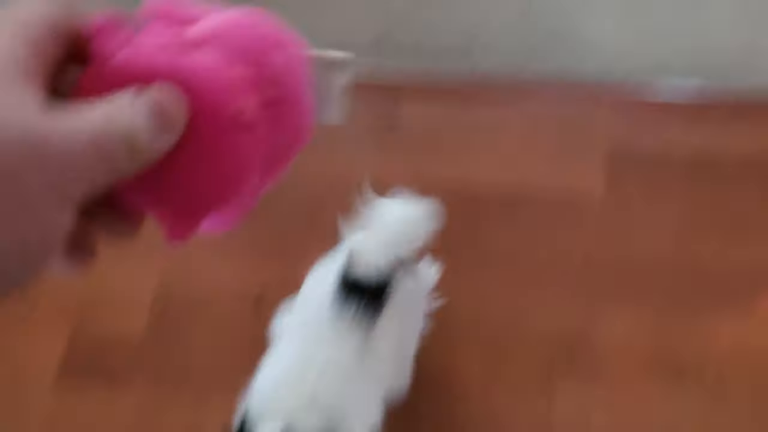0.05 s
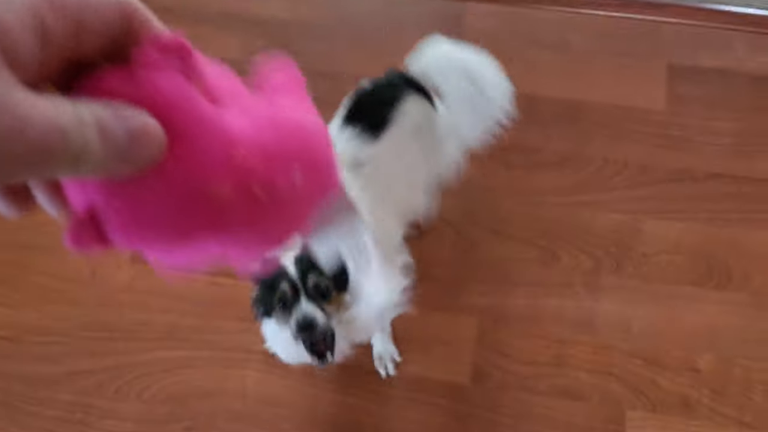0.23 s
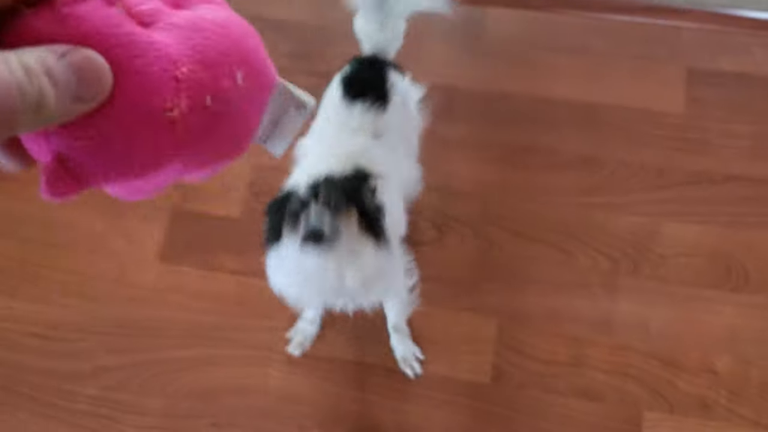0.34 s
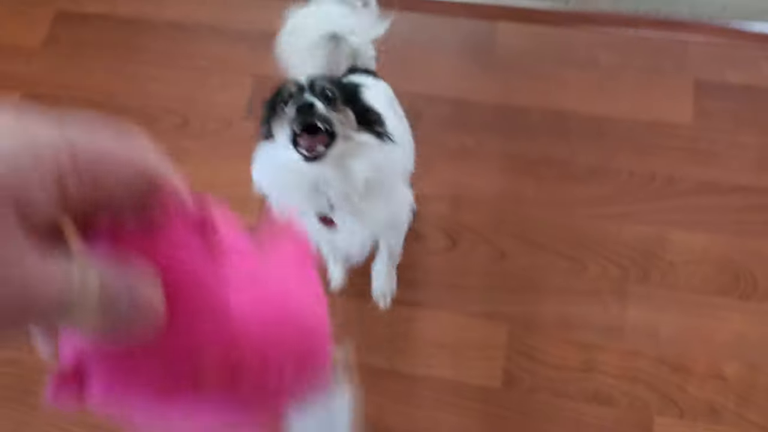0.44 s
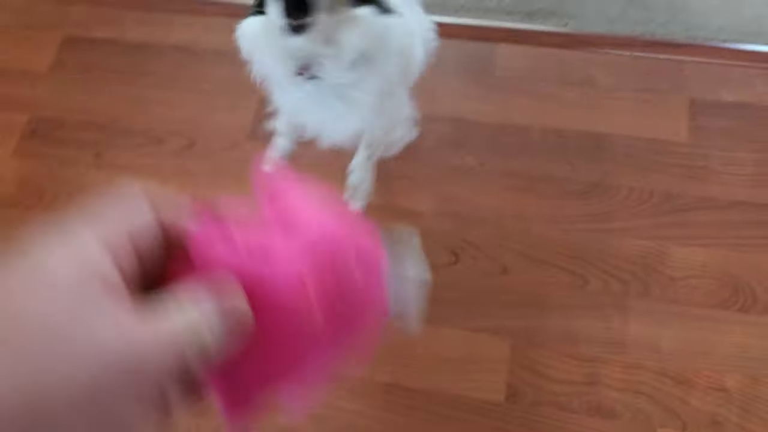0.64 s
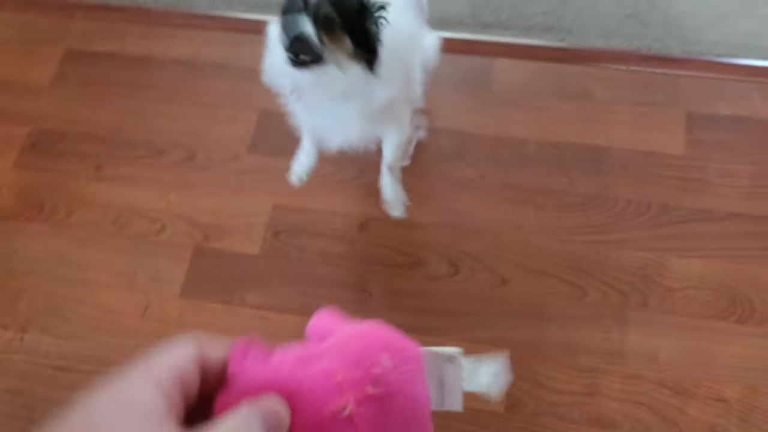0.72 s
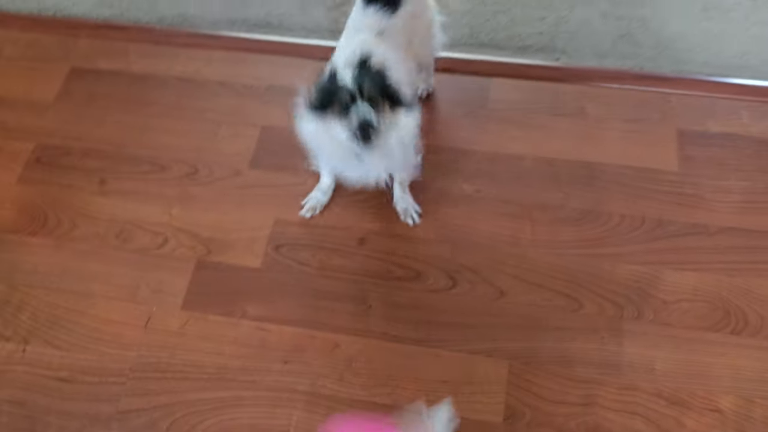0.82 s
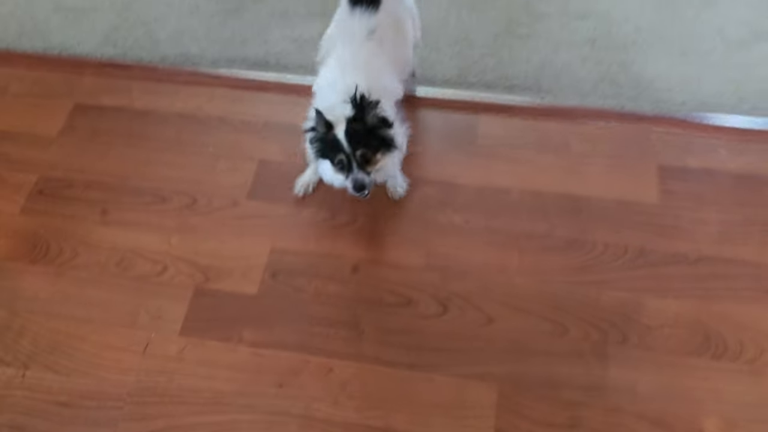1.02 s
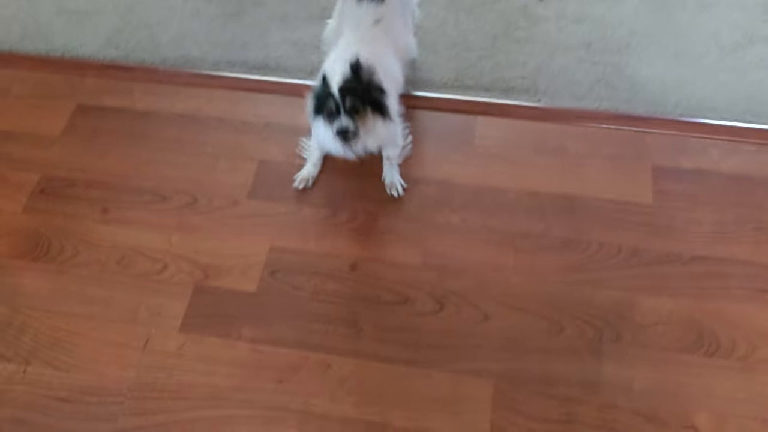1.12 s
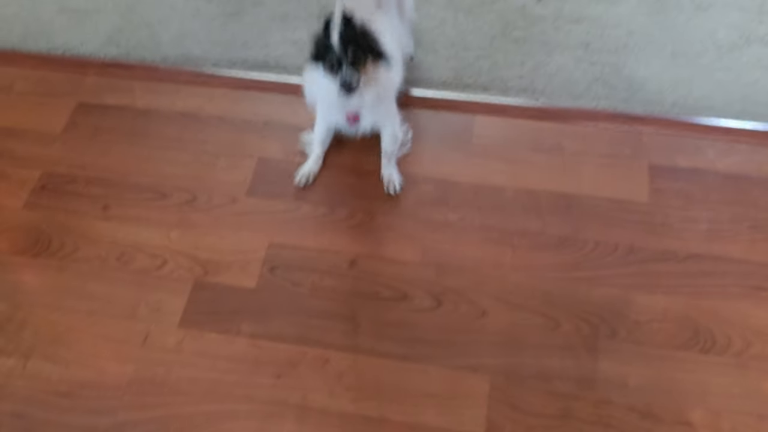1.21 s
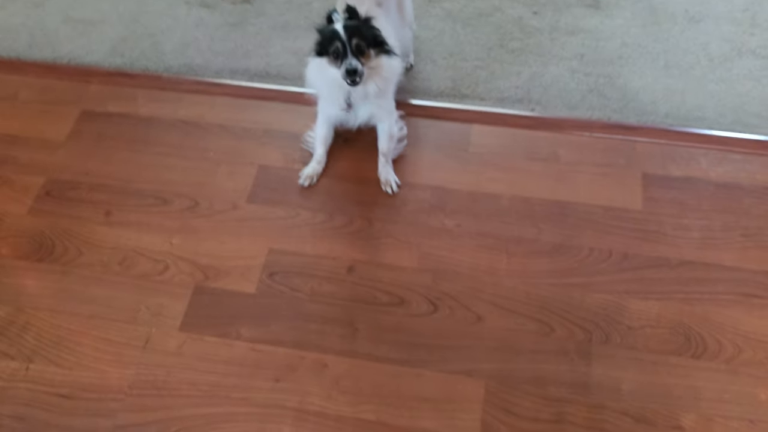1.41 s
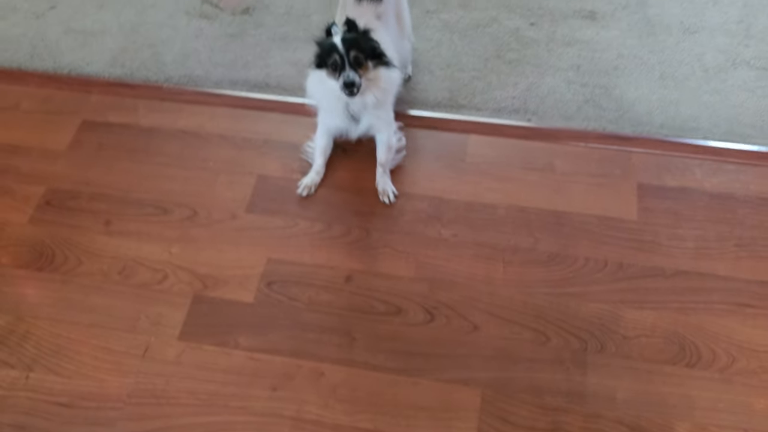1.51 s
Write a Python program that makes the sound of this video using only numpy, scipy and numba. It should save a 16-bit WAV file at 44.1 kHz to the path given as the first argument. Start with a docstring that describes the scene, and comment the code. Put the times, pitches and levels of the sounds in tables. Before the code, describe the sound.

A small dog barks three times in a quiet home with a wooden floor. A paw knock and low floor heave come at 0.05 s amid soft rustle. A high, bright yap hits at 0.23 s, a lower, hoarser one at 0.66, and a last at 1.08 that starts growly and jumps up. Rustles, claw ticks and a soft thud at 0.94 fall between; short room tails, faint air and hum remain.

```python
"""A small dog barks three times, close by, in a room with a hard floor.
Each bark is a train of uneven voice pulses and breath, coloured by resonances of mouth, throat and chest.
Two paw landings and a low chest thump under the first bark are dying tones with noise; claws tick.
Fur and a plush toy rustle as shaped noise. Walls and a fading noise tail answer barks, thuds and ticks.
Behind them the floor heaves once, and there are room air and a faint hum."""
import sys
import numpy as np
from scipy import signal
from scipy.fft import rfft, irfft, next_fast_len
from scipy.io import wavfile
from scipy.ndimage import map_coordinates
from numba import njit

SR = 44100
rng = np.random.default_rng(int(sys.argv[2]) if len(sys.argv) > 2 else 0)


def magnitude_from_level(level_db):
    """Linear magnitude for a level in decibels (20 dB per decade)."""
    exponent = np.asarray(level_db, float) / 20
    return 10 ** exponent


def generate_wav(sig):
    """Save sig (samples, or channels by samples) to the path in sys.argv[1] as 16-bit PCM at SR."""
    pcm = np.round(np.clip(np.atleast_2d(sig).T, -1, 1) * 32767).astype(np.int16)
    wavfile.write(sys.argv[1], SR, pcm)


N = 68355  # length in samples

# how alike left and right are in spread-out noise: (f/Hz, likeness from 0 to 1)
LIKENESS = [(60, 1), (240, 0.7), (950, 0.3), (4000, 0.052)]


def unit(x):
    """Scales a sound to an rms of 1."""
    return x / np.sqrt(np.mean(x ** 2) + 1e-20)


def along(points, hz):
    """Reads a curve of (f/Hz, value) points on a logarithmic frequency axis."""
    f, v = np.transpose(points)
    return np.interp(np.log(hz + 1), np.log(f + 1), v)


def wobble(rate):
    """A smooth random curve with rate random points a second."""
    points = rng.standard_normal(int(N * rate / SR) + 4)
    return map_coordinates(points, [np.arange(N) * rate / SR])


def filtered(x, response):
    """Multiplies the spectrum of x by a response, a function of frequency."""
    n = x.shape[-1]
    m = next_fast_len(n + 8192)
    return irfft(rfft(x, m) * response(np.fft.rfftfreq(m, 1 / SR)), m)[..., :n]


def rush(spectrum, alike):
    """Stereo noise of rms 1: the more side signal is mixed in, the less alike left and right are."""
    def response(hz):
        turn = np.arccos(np.clip(along(alike, hz), -1, 1)) / 2
        return magnitude_from_level(along(spectrum, hz)) * [np.cos(turn), np.sin(turn)]

    mid, side = filtered(rng.standard_normal((2, N)), response)
    return unit(np.array([mid + side, mid - side]))


@njit
def ring(x, a, b):
    """A resonance whose tuning can move: each sample feeds on the two before it."""
    y = np.zeros(len(x) + 2)
    for i in range(len(x)):
        y[i + 2] = x[i] + a[i] * y[i + 1] - b * y[i]
    return y[2:]


def tract(x, hz, width_hz):
    """An air cavity as a resonance passed twice, brought to rms 1."""
    r = np.exp(-np.pi * width_hz / SR)
    a = 2 * r * np.cos(2 * np.pi * hz / SR) * np.ones(len(x))
    sharpened = np.diff(x, n=2, prepend=[0, 0])
    return unit(ring(ring(sharpened, a, r * r), a, r * r))


def voice_source(t, pitch, jitter, alternate, noise):
    """The vocal folds give uneven pulses, and each pulse lets out a puff of noisy breath."""
    draw = rng.standard_normal((200, 2))
    turns = np.cumsum(pitch) / SR
    k = np.arange(int(turns[-1]))
    at = np.interp(k + jitter * np.cumsum(draw[k, 0]), turns, np.arange(len(t)))
    # strong and weak pulses take turns, less and less towards the end
    uneven = 1 + alternate * np.cos(np.pi / 2 * k / len(k)) * (-1) ** k
    size = magnitude_from_level(1.5 * draw[k, 1]) * uneven  # random scatter in dB
    pulses = (size[:, None] * np.sinc(np.arange(len(t)) - at[:, None])).sum(0)
    gate = np.convolve(np.abs(pulses), np.exp(-np.arange(200) / 70))[:len(t)]
    breath = unit(gate * rng.standard_normal(SR // 4)[:len(t)])
    return np.sqrt(1 - noise) * unit(pulses) + np.sqrt(noise) * breath, breath


def bark(rows, jitter, alternate, noise_start, noise_end, upper_start_hz, upper_end_hz,
         throat_hz, throat_db, chest_hz, teeth_hz, onset_db, later_db):
    """Voice pulses and breath sound through mouth, upper, throat, chest and teeth resonances."""
    # breath hiss, shape only: (f/Hz, level/dB per Hz)
    rasp_shape = [(2000, -1.5), (3000, -6.5), (4900, -5.5), (6700, -5.5), (10500, -14), (15800, -17.5)]
    s, *cols = np.transpose(rows)
    t = np.arange(s[0], s[-1], 1 / SR)
    db, pitch, mouth_hz, upper_db, chest_db, hiss_db = (np.interp(t, s, c) for c in cols)
    body = s[[1, -2]]  # glides run from the second point to the last but one
    noise = np.interp(t, body, [noise_start, noise_end])
    upper_hz = np.interp(t, body, [upper_start_hz, upper_end_hz])
    teeth_db = np.interp(t, s[1:3], [onset_db, later_db])
    source, breath = voice_source(t, pitch, jitter, alternate, noise)

    def chest_response(hz):
        return np.exp(-(np.log2((hz + 1) / chest_hz) / 1.05) ** 2)  # half-width in octaves

    def rasp_response(hz):
        return magnitude_from_level(along(rasp_shape, hz) - 60 * (hz < 1500))

    voice = tract(source, mouth_hz, 340)
    voice = voice + magnitude_from_level(upper_db) * tract(source, upper_hz, 230)
    voice = voice + magnitude_from_level(throat_db + upper_db / 2) * tract(source, throat_hz, 330)
    voice = voice + magnitude_from_level(chest_db) * unit(filtered(source + breath, chest_response))
    voice = voice + magnitude_from_level(hiss_db + 7.5) * unit(filtered(breath, rasp_response))
    voice = voice + magnitude_from_level(teeth_db) * tract(breath, teeth_hz, 740)
    fade = np.clip((s[-1] - t) / 0.014, 0, 1)
    return np.pad(magnitude_from_level(db) * fade * voice, (round(s[0] * SR), N))[:N]


def dog():
    """Three barks, each with its own voice and with more room tail as the dog backs away."""
    # one list a bark: (t/s, level/dB, pitch/Hz, mouth resonance f/Hz,
    # upper resonance level/dB, chest level/dB, breath hiss relative level/dB)
    bark_points = [
        [(.22, -48, 559.1, 1206, -11.5, -0.5, -6), (.232, -34.5, 594, 1270, -15, 7, -17),
         (.244, -8.5, 614.7, 1190, -28.5, -8, -39.5), (.268, -11, 659.9, 1451, -18, -14.5, -27),
         (.296, -7.5, 724, 1381, -45, -62, -27.5), (.309, -10.5, 730, 1504, -46, -46, -17.5),
         (.328, -41, 566, 1165, -3.5, -14, -45)],
        [(.648, -67, 366.5, 1346, -12.5, -6, -20), (.662, -31, 374.7, 1280, -15, -7.5, -21),
         (.682, -16.5, 385.6, 1207, 0.5, -47.5, -24.5), (.705, -11.5, 379.5, 1445, -24.5, -16.5, -20),
         (.74, -12, 391.9, 1530, -5, -32.5, -26), (.77, -29.5, 376, 1400, -49, -7, -4.5)],
        [(1.074, -59, 280.1, 952, 7, 19, 0.5), (1.092, -22.5, 281.5, 1060, -6, -6, -24),
         (1.118, -19, 288.1, 1110, 9, -13.5, -20.5), (1.134, -14, 620, 1206, -0.5, -49, -29.5),
         (1.148, -13, 701, 1408, -16.5, -39.5, -26.5), (1.168, -12, 654.6, 1340, -36.5, -32, -35),
         (1.186, -20.5, 618, 1174, -14, -20, -3.5)],
    ]
    # per bark: (pulse timing jitter as share of a period, depth of strong-weak pulses at the start 0-1,
    # noise share 0-1 at the start, at the end)
    voices = [(.025, .7, .35, .01), (.05, .3, .55, .45), (.025, .4, .35, .04)]
    # per bark: (upper resonance f/Hz at the start, at the end, throat f/Hz, throat relative level/dB,
    # chest f/Hz, hiss at the teeth f/Hz, its level/dB at the onset, later)
    throats = [(1924, 1950, 3360, -12, 900, 5750, -30, -23), (1764, 1870, 3400, -28, 570, 6100, -27, -25),
               (1833, 1860, 2438, -12.5, 355, 4900, -5, -50.5)]
    # per bark: (room tail level/dB)
    tail_levels = [-10, -9, -6.5]
    out = 0
    for rows, voice, throat, tail_db in zip(bark_points, voices, throats, tail_levels):
        out = out + placed(bark(rows, *voice, *throat), -6, .00008, tail_db)
    return out


def modes(table, t):
    """Several dying tones that start with opposite signs in turn, as from a struck body."""
    out = 0
    for k, (hz, level, t60) in enumerate(table):
        out = out + (-1) ** k * magnitude_from_level(level - 60 * t / t60) * np.sin(2 * np.pi * hz * t)
    return out


def low_thuds():
    """Two paw landings and a chest thump: a soft low thud with some board ring and noisy slap."""
    # low thuds: two paw landings and, at 0.227 s, the low chest thump that opens the first bark:
    # (t/s, thud level/dB, boards level/dB)
    thud_table = [(0.0396, -37, -26.5), (0.227, -34, -52.5), (0.938, -32.5, -45.5)]
    # soft thud: (f/Hz, relative level/dB, time to fall by 60 dB/s)
    soft_modes = [(115, 2, 0.043), (228.6, 0, 0.1), (375, 1.5, 0.047), (612, -9, 0.016)]
    # floor boards: (f/Hz, relative level/dB, time to fall by 60 dB/s)
    board_modes = [(381.2, 0, .07), (620, -0.5, 0.022), (789, -0.5, 0.043), (1060, -0.5, .02),
                   (1490, -10, 0.021)]
    out, t = np.zeros(N + SR), np.arange(SR // 4) / SR
    for s, thud_db, boards_db in thud_table:
        slap = magnitude_from_level(5 - 60 * t / 0.018) * rng.standard_normal(len(t))  # falls by 60 dB in 0.018 s
        soft_start = 1 - np.exp(-t / 0.00183)
        thud = magnitude_from_level(thud_db) * modes(soft_modes, t) * soft_start
        out[round(s * SR):][:len(t)] += magnitude_from_level(boards_db) * (modes(board_modes, t) + slap) + thud
    return out[:N]


def claw_ticks():
    """A claw on the boards gives a very short tone with some noise."""
    # ticks: (t/s, level of the tone at its start/dB, f/Hz)
    claw_hits = [(0.111, -36, 1330), (.63, -39.5, 12550), (0.819, -37.5, 12600), (1.023, -34.5, 1380),
                 (1.378, -44, 11740), (1.507, -45, 5960)]
    out, t = np.zeros(N + SR), np.arange(SR // 4) / SR
    for s, db, hz in claw_hits:
        tick = np.sin(2 * np.pi * hz * t) + 0.2 * rng.standard_normal(len(t))
        out[round(s * SR):][:len(t)] += magnitude_from_level(db - 60 * t / 0.0083) * tick  # falls by 60 dB in 0.0083 s
    return out[:N]


def room(x, tail_db):
    """Near walls, then a tail that swells and in which each frequency dies at its own speed."""
    # decay: (f/Hz, time to fall by 60 dB/s)
    decay_times = [(700, 0.37), (1400, 0.38), (2450, 0.42), (8000, 0.38)]
    # colour of the tail: (f/Hz, relative level/dB)
    tail_colour = [(300, 1.5), (900, 7.5), (1400, 1), (1900, -1.5), (2450, 5), (5000, 0), (12000, 0.5)]
    hz, t, z = signal.stft(rush([(20, 0)], LIKENESS)[:, :SR], SR, nperseg=256)
    decay_db = along(tail_colour, hz)[:, None] - 60 * t / along(decay_times, hz)[:, None]
    swell = 1 - np.exp(-t / 0.013)
    tail = signal.istft(z * magnitude_from_level(decay_db) * swell, SR, nperseg=256)[1]
    tail = magnitude_from_level(tail_db) * tail / np.linalg.norm(tail[0])
    # six wall echoes a side, 1.8 to 15 ms late
    when = (SR * rng.uniform(0.0018, .015, (2, 6))).astype(int)
    tail[[[0], [1]], when] += magnitude_from_level(-10) * rng.uniform(-1.07, 1, (2, 6))
    return signal.fftconvolve(x[None], tail, axes=1)[:, :N]


def placed(x, pan_db, lag_s, tail_db):
    """Direct sound, differing in level and arrival time between left and right, plus the room."""
    sides = np.array([[1], [-1]])

    def response(hz):
        return magnitude_from_level(sides * pan_db / 2) * np.exp(1j * np.pi * hz * lag_s * sides)

    return filtered(x, response) + room(x, tail_db)


def rustle():
    """Strokes of fur, plush and pads: grainy hiss, fine sizzle and a dull scuff, all shaped noise."""
    # strokes: (start t/s, length/s, hiss level/dB, dull scuff level/dB, fine sizzle level/dB)
    stroke_table = [(0, .2, -46.5, -54, -68), (0.342, 0.064, -49, -40.5, -50),
                    (0.399, 0.076, -44.5, -44.5, -54), (0.757, 0.15, -43, -44.5, -46.5),
                    (0.909, 0.087, -52, -52, -53), (1.007, 0.12, -56, -54, -53)]
    # fur hiss, shape only: (f/Hz, level/dB per Hz)
    fur_shape = [(1500, -17.5), (2400, 4), (4800, 15.5), (8000, 10), (12000, -0.5), (15800, -12)]
    # dull scuff, shape only: (f/Hz, level/dB per Hz)
    scuff_shape = [(90, -21.5), (220, -1), (800, -8.5), (1500, -31.5)]
    sizzle_shape = [(7000, -33.5), (12000, -7.0), (16000, -26)]  # same columns
    t = np.arange(N) / SR
    s, length, *levels_db = np.transpose(stroke_table)[..., None]
    # the fade out is 2.9 times as slow as the fade in
    inside = np.minimum(t - s, (s + length - t) / 2.9)
    strokes = np.clip(inside / 0.025 + .5, 0, 1) ** 2 * magnitude_from_level(1.7 * wobble(59.4))
    hiss, scuff, sizzle = ((strokes * magnitude_from_level(db)).sum(0) for db in levels_db)
    grain = magnitude_from_level(0.97 * wobble(400))
    bright = hiss * rush(fur_shape, LIKENESS) + sizzle * rush(sizzle_shape, LIKENESS)
    return grain * bright + scuff * rush(scuff_shape, LIKENESS)


def floor_heave():
    """The floor heaves after the first paw landing: a low tone that swells for 0.04 s, then dies."""
    start_s, pitch_hz, rise_s = .058, 45, .04
    t = np.arange(N) / SR - start_s
    age = np.clip(t, 0, None) / rise_s
    return magnitude_from_level(-25) * age * np.exp(-age) * np.sin(2 * np.pi * pitch_hz * t)


def room_air():
    """Soft steady noise, strongest in the bass, whose level wavers a little."""
    # room air, shape only: (f/Hz, level/dB per Hz)
    air_shape = [(25, -27), (55, 1), (170, -10.5), (370, -11), (1000, -25), (2000, -23), (5000, -34.5),
                 (15800, -39)]
    return magnitude_from_level(-51 + 1.21 * wobble(47)) * rush(air_shape, LIKENESS)


def hum():
    """Three faint steady tones, each wavering in level."""
    # hum tones: (f/Hz, middle peak level/dB)
    hum_tones = [(120, -61), (242, -59.5), (359, -58)]
    t = np.arange(N) / SR
    return sum(magnitude_from_level(db + wobble(9.6)) * np.sin(2 * np.pi * hz * t) for hz, db in hum_tones)


def scene():
    """Adds the barks, the low thuds and claw ticks, the rustle and the background."""
    thuds_and_ticks = placed(low_thuds() + claw_ticks(), -1.72, .00005, -7.5)
    return dog() + thuds_and_ticks + rustle() + floor_heave() + room_air() + hum()


def top_cut(x):
    """Nothing passes above the cut-off."""
    return signal.sosfilt(signal.butter(12, 16360, fs=SR, output="sos"), x)


def record(dry):
    """The input clips softly at full scale: loud peaks are bent below 1."""
    hardness = 5
    mix = dry / (1 + np.abs(dry) ** hardness) ** (1 / hardness)
    return top_cut(mix)


dry = scene()
out = record(dry)
generate_wav(out)
```